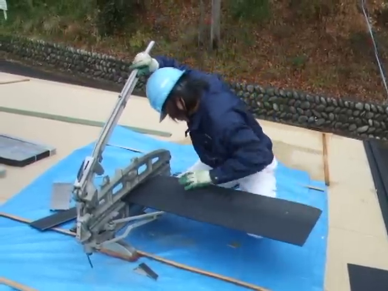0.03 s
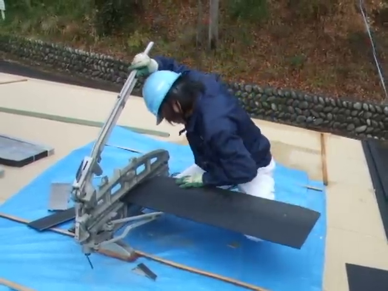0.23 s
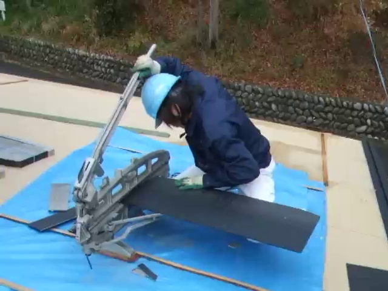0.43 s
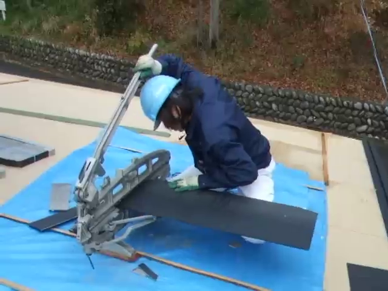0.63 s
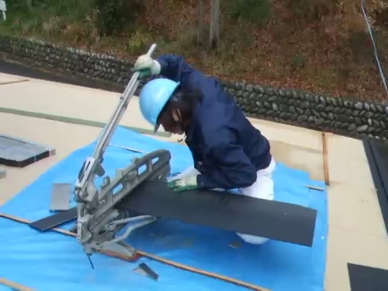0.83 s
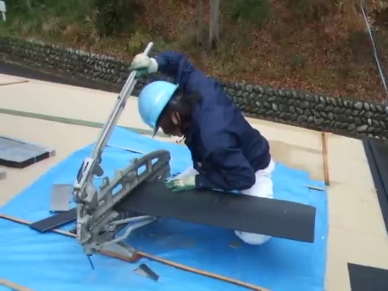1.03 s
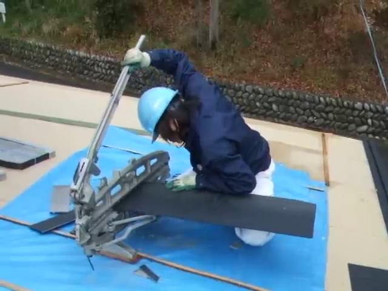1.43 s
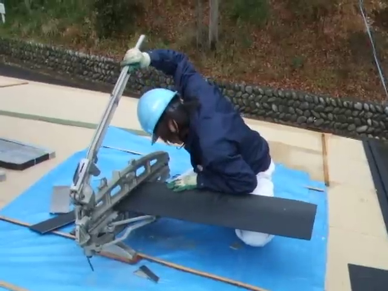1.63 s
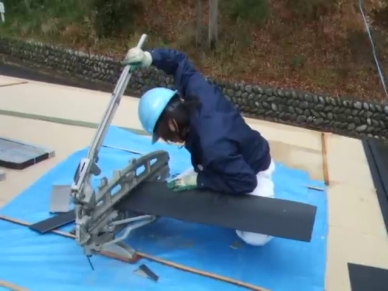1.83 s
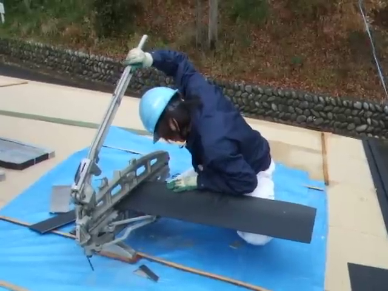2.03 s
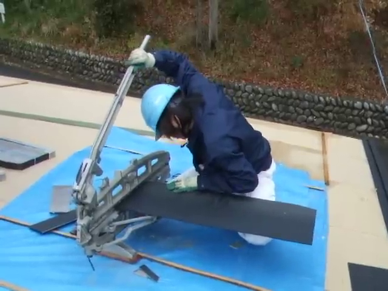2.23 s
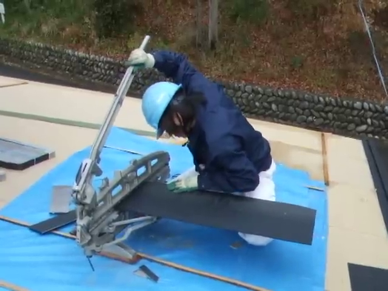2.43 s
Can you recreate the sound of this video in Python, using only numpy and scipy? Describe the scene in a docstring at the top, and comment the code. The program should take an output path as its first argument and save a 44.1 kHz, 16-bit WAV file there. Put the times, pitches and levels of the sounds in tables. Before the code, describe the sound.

A slate board knocks onto a steel cutter and scrapes into place with gritty pushes.

```python
"""A slate roofing board is shifted into a hand cutter on an open roof.
It knocks down on the steel bed, slides in with two gritty pushes and is nudged into line.
Its edge catches, grates and makes the bed clink; board and frame ring, the deck thuds and scatters.
A faint outdoor rumble and hiss lie underneath, with a low rustle and one brief hum."""
import sys
import numpy as np
from scipy import signal
from scipy.fft import rfft, irfft, next_fast_len
from scipy.io import wavfile
from scipy.ndimage import uniform_filter1d

SR = 44100
rng = np.random.default_rng(int(sys.argv[2]) if len(sys.argv) > 2 else 0)


def generate_wav(signal):
    """Clip the signal to [-1, 1] and save it as 16-bit WAV at the path in sys.argv[1]."""
    frames = np.transpose(np.atleast_2d(signal))
    scaled = np.clip(frames, -1, 1) * 32767
    pcm = np.round(scaled).astype(np.int16)
    wavfile.write(sys.argv[1], SR, pcm)


N = 110250
TIME = np.arange(N) / SR
CUTOFF_HZ = 8750


def from_db(db):
    """Decibels to gain."""
    return 10 ** (np.asarray(db) / 20)


def unit_rms(x):
    """Scale to rms 1."""
    return x / np.sqrt(np.mean(x ** 2) + 1e-20)


def colour(x, spectrum):
    """Minimum-phase filter with the given spectrum and unit power gain."""
    size = next_fast_len(2 * N)
    size += size % 2
    hz, db = np.transpose(spectrum)
    bins_hz = np.arange(size // 2 + 1) * SR / size
    gain = unit_rms(from_db(np.interp(np.log(bins_hz + 1), np.log(hz), db)))
    cepstrum = irfft(np.log(gain))
    cepstrum[1:size // 2] *= 2
    cepstrum[size // 2 + 1:] = 0
    return irfft(rfft(x, size) * np.exp(rfft(cepstrum)))[:N]


def resonance(x, hz, width_hz):
    """Two-pole resonator, peak gain 1."""
    r = np.exp(-np.pi * width_hz / SR)
    feedback = [1, -2 * r * np.cos(2 * np.pi * hz / SR), r * r]
    return signal.lfilter((1 - r * r) / 2 * np.array([1, 0, -1]), feedback, x + 1e-18)


def decay(t, t60_s, rise_s=0.00024):
    """Contact envelope: quick rise, exponential fall."""
    age = np.maximum(TIME - t, 0)
    return np.minimum(age / rise_s, 1) * from_db(-60 * np.minimum(age / t60_s, 4))


def crunch(t, t60_s, rise_s=0.00082, hold_s=0.0012):
    """Envelope of slate meeting steel: holds for a moment, then dies away."""
    age = TIME - t
    return np.clip(age / rise_s, 0, 1) * from_db(-60 * np.clip((age - hold_s) / t60_s, 0, 4))


def swell(t, width_s):
    """Gaussian envelope centred on t."""
    return np.exp(-((TIME - t) / width_s) ** 2 / 2)


def wander(per_s):
    """Line through unit-normal random points, per_s a second."""
    return np.interp(TIME * per_s, np.arange(4000), rng.standard_normal(4000))


def band_noise(low_hz, high_hz):
    """Band-passed noise, rms 1."""
    band = signal.butter(2, [low_hz, high_hz], "band", fs=SR, output="sos")
    return unit_rms(signal.sosfilt(band, rng.standard_normal(N)))


def even_noise():
    """Noise with its short-term level evened: many close modes sounding together."""
    x = signal.sosfilt(signal.butter(4, CUTOFF_HZ, fs=SR, output="sos"), rng.standard_normal(N))
    return x * x.std() / np.sqrt(uniform_filter1d(x * x, size=64) + 1e-9)


def stick_slip(slips_per_s=4000, spread_db=2.5, judder_per_s=250, judder_db=1):
    """Tiny slips of uneven size that come in judders; rms 1."""
    sizes = from_db(spread_db * np.minimum(rng.exponential(1, N), 4)) * rng.choice([-1, 1], N)
    slips = sizes * (rng.random(N) < slips_per_s / SR) * from_db(judder_db * wander(judder_per_s))
    return slips / np.sqrt(np.abs(uniform_filter1d(slips ** 2, size=700)) + 1e-9)


# clack and board spectra: f/Hz, level/dB
CLACK_SPECTRUM = [(300, -32), (880, -12.5), (1600, -17.5), (2400, -8.5), (3100, 2.5), (3800, 0.5),
                  (4500, 0.5), (5400, -4.5), (6200, -5), (7300, -16), (8800, -45)]
BOARD_SPECTRUM = [(70, -30.5), (290, 1.5), (660, -9), (920, 5.5), (1200, 4), (1500, -2.5), (2100, -3),
                  (2600, -11.5), (5000, -32)]
# board on bed: t/s, clack/dB, low-pass/Hz, pitch/Hz, board ring/dB, deck thud/dB
KNOCKS = [(.001, -34.5, 4930, 3550, -43.5, -46), (0.2313, -17, 6000, 3950, -28.5, -41.5),
          (0.2875, -23, 5900, 3350, -40, -39), (0.317, -27, 4500, 3140, -30, -53.5),
          (0.3313, -27.5, 3920, 3170, -49, -43), (0.4546, -24, 4030, 3080, -48, -66),
          (1.1079, -39.5, 4070, 2900, -45, -45.5), (2.23, -35, 9000, 3700, -44, -46)]


def knocks(clack_t60_s=0.021, board_t60_s=0.11, deck_t60_s=0.13, deck_hz=372):
    """The board hits the bed: a clack pitched by the contact point, a lower ring, a deck thud."""
    clack, ring, thud, noise = 0, 0, 0, even_noise()
    for t, clack_db, lowpass_hz, pitch_hz, ring_db, deck_db in KNOCKS:
        lowpass = signal.butter(1, lowpass_hz, fs=SR)
        contact = from_db(clack_db) * signal.lfilter(*lowpass, noise * crunch(t, clack_t60_s) + 1e-18)
        clack += contact + from_db(-5) * resonance(contact, pitch_hz, width_hz=600)
        ring += from_db(ring_db) * decay(t, board_t60_s)
        thud += from_db(deck_db) * decay(t, deck_t60_s)
    deck = thud * band_noise(deck_hz / 2, deck_hz * 1.42)
    return colour(clack, CLACK_SPECTRUM) + colour(ring * even_noise(), BOARD_SPECTRUM) + deck


# board and cutter frame modes: f/Hz, width/Hz, gain/dB
FRAME_MODES = [(304, 36, -12.5), (892, 22, -4.5), (1023, 13.6, -10.5), (2085, 15, -2), (2526, 63, -2),
               (2997, 24, 6), (3800, 230, -1), (4310, 130, -4.5), (5910, 82, -1), (6810, 44, 5.5)]


def board_and_frame(x, ring_db=0, wander_db=0, wander_per_s=120):
    """Add the modes' ringing; wander_db lets a moving contact favour now one, now another."""
    out = x
    for hz, width_hz, db in FRAME_MODES:
        drive = x * unit_rms(from_db(wander_db * wander(wander_per_s)))
        out = out + from_db(db + ring_db) * resonance(drive, hz, width_hz)
    return out


# outdoor background: f/Hz, level/dB
AIR_SPECTRUM = [(22, 9), (40, -4.5), (110, -5.5), (200, 0.5), (500, -7), (900, -9.5), (1700, -14),
                (3000, -16), (7000, -16), (8300, -25), (9300, -64.5)]


def outdoor_air(level_db=-50):
    """Steady rumble and hiss."""
    return from_db(level_db) * unit_rms(colour(rng.standard_normal(N), AIR_SPECTRUM))


# body movements: t/s, width/s, level/dB
RUSTLES = [(0.05, 0.044, -51), (0.33, 0.061, -50.5), (0.559, 0.024, -47)]


def rustles():
    """Knees and sleeves shift on the sheeting with a low rustle."""
    envelope = sum(from_db(db) * swell(t, width_s) for t, width_s, db in RUSTLES)
    return envelope * band_noise(36, 216)


# edge snaps: t/s, level/dB
CATCHES = [(0.0632, -30), (0.151, -33), (0.43, -31), (0.4812, -23), (0.4938, -16.5), (0.516, -24),
           (0.546, -27.5), (0.614, -16.5), (0.6285, -19.5), (0.6747, -13.5), (0.6984, -13.5), (0.708, -19),
           (0.733, -16.5), (.772, -22), (.783, -24), (0.9052, -33.5), (0.990, -27.5), (1.003, -36),
           (1.0193, -47), (1.465, -38.5), (1.495, -36.5), (1.556, -33), (2.2082, -27)]
# snap spectrum: f/Hz, level/dB
CATCH_SPECTRUM = [(500, -27), (1000, -13.5), (2300, -15.5), (3900, 0.5), (4700, 1), (5400, -7),
                  (6100, -2.5), (8800, -32.5)]


def catches(t60_s=0.011):
    """The edge catches and snaps free."""
    envelope = sum(from_db(db) * crunch(t, t60_s) for t, db in CATCHES)
    return colour(envelope * even_noise(), CATCH_SPECTRUM)


# friction in the long slide: t/s, level/dB
SLIDE_FRICTION = [(.426, -49), (.433, -32.5), (.45, -39.5), (.47, -33), (.485, -27), (.51, -29),
                  (.545, -28), (.572, -46), (.606, -38), (.616, -27), (.646, -22), (.664, -30),
                  (.674, -21.5), (.712, -26), (.738, -24), (.76, -35.5), (.79, -34), (.83, -48.5)]
# short pushes: t/s, length/s, grit/dB, groan/dB
NUDGES = [(0.12, 0.064, -45, -50), (0.873, 0.1, -52, -66), (0.985, 0.061, -34, -39.5),
          (1.037, 0.042, -44.5, -44), (1.416, 0.034, -44, -50.5), (1.47, 0.063, -39.5, -48),
          (1.521, 0.064, -42, -54.5), (1.565, 0.063, -48, -58.5), (2.121, 0.19, -47.5, -53),
          (2.192, 0.057, -43, -44)]
# grit spectrum: f/Hz, level/dB
GRIT_SPECTRUM = [(500, -18), (1400, -1.5), (2300, -1), (3100, 3.5), (4250, 0.5), (4800, 6.5), (5400, -1.5),
                 (6600, -6), (8100, -14), (8800, -38.5)]


def scrapes(attack_s=0.016, release_s=0.025, groan_db_per_db=0.74):
    """Slate rubs on steel: the same slips drive bright grit and a low groan of the board."""
    friction_db = np.interp(TIME, *np.transpose(SLIDE_FRICTION), left=-120, right=-120)
    grit = from_db(friction_db)
    groan = from_db(-35 + groan_db_per_db * (friction_db + 25))
    for t, length_s, grit_db, groan_db in NUDGES:
        push = np.clip((TIME - t) / attack_s, 0, 1) * np.clip((t + length_s - TIME) / release_s, 0, 1)
        grit += from_db(grit_db) * push
        groan += from_db(groan_db) * push
    slips = stick_slip()
    return colour(grit * slips, GRIT_SPECTRUM) + colour(groan * slips, BOARD_SPECTRUM)


# corner contacts: t/s, level/dB
TICKS = [(.1222, -40), (.175, -44), (.411, -45), (1.4198, -45), (2.046, -46), (2.1203, -42), (2.1502, -36),
         (2.1752, -42), (2.2096, -33), (2.2305, -33), (2.25, -41), (2.3143, -46.5), (2.435, -47)]
# tick spectrum: f/Hz, level/dB
TICK_SPECTRUM = [(2000, -16.5), (3700, 5), (6700, 1), (8800, -25)]


def ticks(t60_s=0.032):
    """The corner grazes the guide: light, thin ticks."""
    envelope = sum(from_db(db) * crunch(t, t60_s) for t, db in TICKS)
    return colour(envelope * even_noise(), TICK_SPECTRUM)


# edge drags: t/s, width/s, f/Hz, level/dB
GRATES = [(0.489, 0.012, 4070, -30.5), (0.521, .02, 3150, -36), (0.635, .009, 3930, -26),
          (.673, 0.0028, 2920, -26), (0.678, .005, 4580, -24), (.703, .009, 4650, -23.5),
          (0.733, 0.0043, 4520, -26), (.915, 0.024, 4660, -50), (1.012, 0.0081, 4730, -34.5)]


def grates(width_hz=280):
    """The dragged edge grates in a narrow band that shifts with the contact point."""
    out, slips = 0, stick_slip()
    for t, width_s, hz, db in GRATES:
        band = resonance(resonance(slips, hz, width_hz), hz, 2 * width_hz)
        local_rms = np.sqrt(np.abs(uniform_filter1d(band ** 2, size=500)) + 1e-12)
        out += from_db(db) * swell(t, width_s) * band / local_rms
    return out


def dust(t=0.61, width_s=0.013, level_db=-50):
    """Loose dust hisses under the edge."""
    return from_db(level_db) * swell(t, width_s) * band_noise(7000, 8700)


# hard edge hits: t/s, level/dB
BED_STRIKES = [(0.6121, -16), (.6272, -29)]
# steel bed modes: f/Hz, level/dB, t60/s
BED_MODES = [(1000, -11, .06), (3200, -3.5, 0.051), (3840, 1, 0.022), (4790, 2.5, 0.033), (5650, 0, 0.019),
             (6470, -6.5, 0.026)]


def clinks():
    """A hard hit rings the damped modes of the steel bed."""
    return sum(from_db(db + mode_db) * crunch(t, t60_s) * np.sin(2 * np.pi * (hz * TIME + rng.random()))
               for t, db in BED_STRIKES for hz, mode_db, t60_s in BED_MODES)


# rubbed board tones: t/s, width/s, f/Hz, level/dB
RUB_RINGS = [(1.015, 0.015, 1150, -40.5), (1.548, 0.017, 945, -46.5)]


def rub_rings():
    """The edge rubs up a brief ring in the board."""
    return sum(from_db(db) * swell(t, width_s) * np.sin(2 * np.pi * hz * (TIME - t))
               for t, width_s, hz, db in RUB_RINGS)


# weight shifts: t/s, level/dB
DECK_BUMPS = [(1.037, -49), (1.644, -50.5)]


def deck_bumps(hz=79, t60_s=0.26):
    """The deck thuds as weight shifts on it."""
    return sum(from_db(db) * decay(t, t60_s) * np.sin(2 * np.pi * hz * (TIME - t))
               for t, db in DECK_BUMPS)


def hum(t=1.86, width_s=0.036, hz=143, rise_hz_per_s=310, level_db=-50, octave_db=-52.5):
    """A brief low hum swells and rises in pitch."""
    age = TIME - t
    phase = 2 * np.pi * (hz * age + rise_hz_per_s * age ** 2 / 2)
    tone = from_db(level_db) * np.sin(phase) + from_db(octave_db) * np.sin(2 * phase)
    return swell(t, width_s) * tone


def roof_scatter(x, delay_s=0.0056, split_hz=1600):
    """Add quick scatter from deck and frame, shorter in the treble, and a faint hillside tail."""
    white = rng.standard_normal((3, N))
    lowpass = signal.butter(2, split_hz, fs=SR)
    highpass = signal.butter(2, split_hz, "high", fs=SR)
    low = signal.lfilter(*lowpass, unit_rms(white[0] * decay(delay_s, t60_s=0.13)))
    high = signal.lfilter(*highpass, unit_rms(white[1] * decay(delay_s, t60_s=0.1)))
    dull_noise = signal.lfilter(*signal.butter(1, 2500, fs=SR), white[2])
    hillside = unit_rms(dull_noise * decay(0.023, t60_s=0.4))
    response = from_db(-5) * low + from_db(-9.5) * high + from_db(-25) * hillside
    return x + signal.fftconvolve(x, response)[:N] / np.sqrt(N)


def scene():
    """Board and cutter on the roof, over the background; mono."""
    # a loose knock excites the modes less than the pressed edge
    knocking = board_and_frame(knocks(), ring_db=-12)
    sliding = board_and_frame((catches() + scrapes()) / np.sqrt(2), wander_db=4.5)
    slate = roof_scatter(knocking + sliding + grates() + clinks() + ticks())
    return (slate + dust() + rub_rings() + rustles() + deck_bumps() + hum() + outdoor_air())[None]


def record(dry, ceiling=0.85):
    """Soft clip, then steep low-pass."""
    rounded = ceiling * np.tanh(dry / ceiling)
    return signal.sosfilt(signal.ellip(10, .2, 80, CUTOFF_HZ, fs=SR, output="sos"), rounded)


dry = scene()
out = record(dry)
generate_wav(out)
```